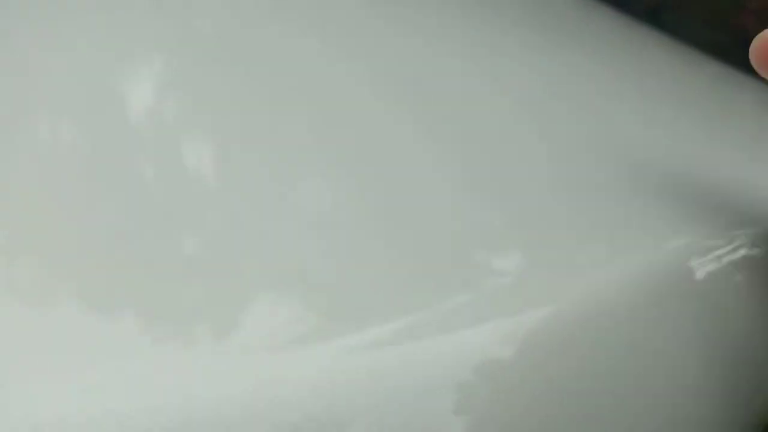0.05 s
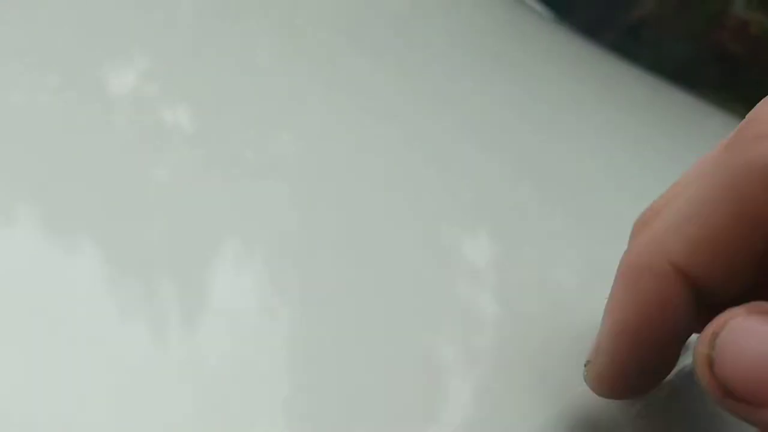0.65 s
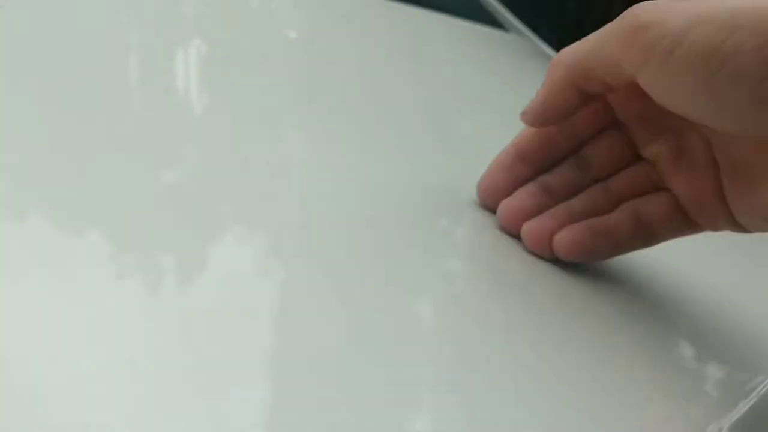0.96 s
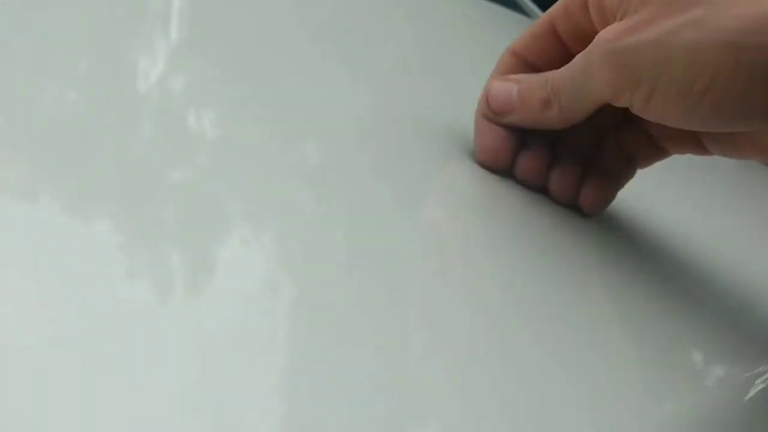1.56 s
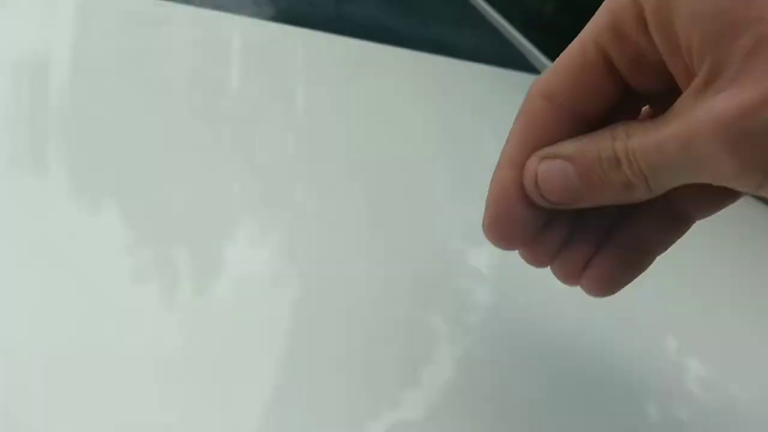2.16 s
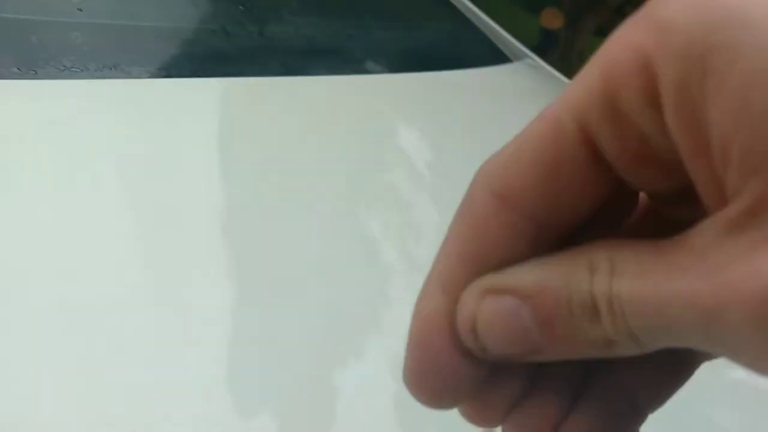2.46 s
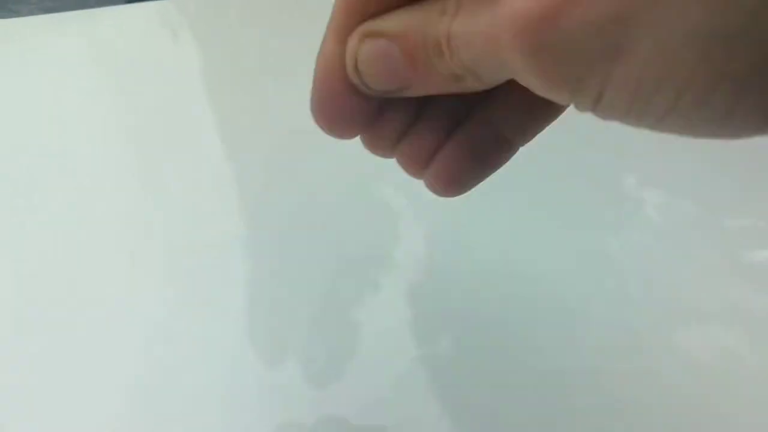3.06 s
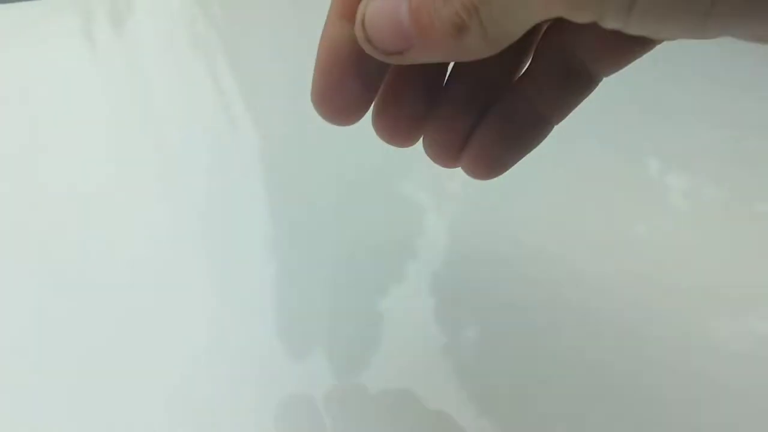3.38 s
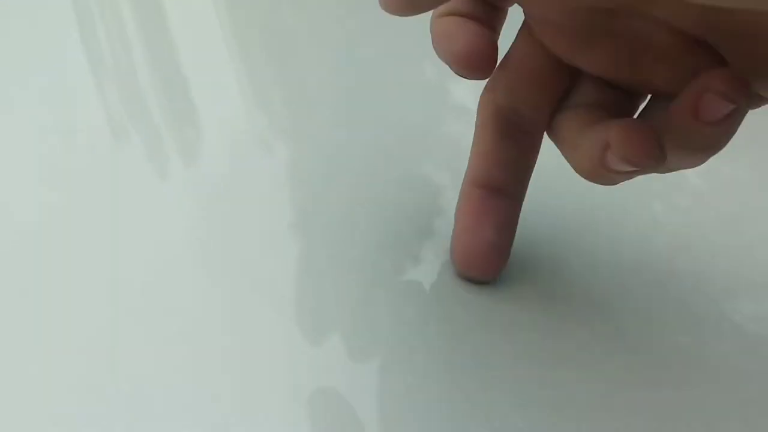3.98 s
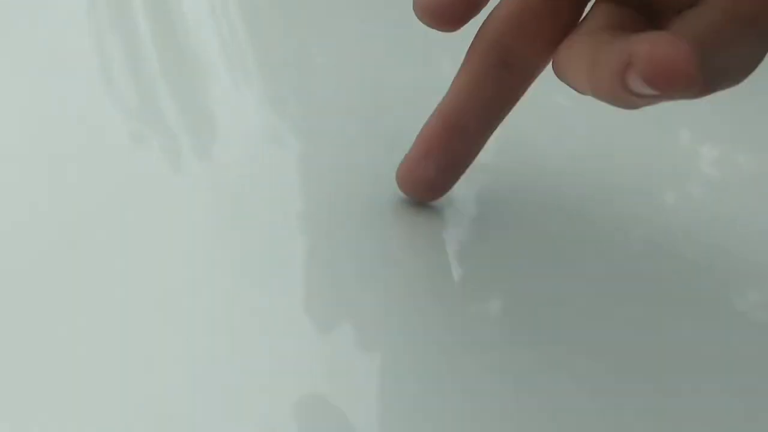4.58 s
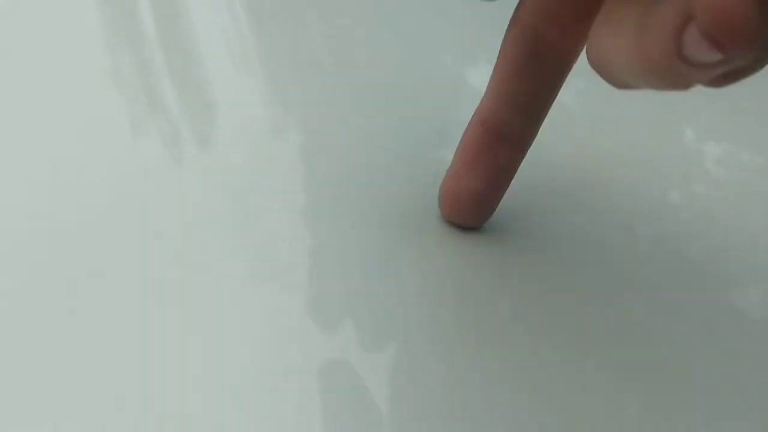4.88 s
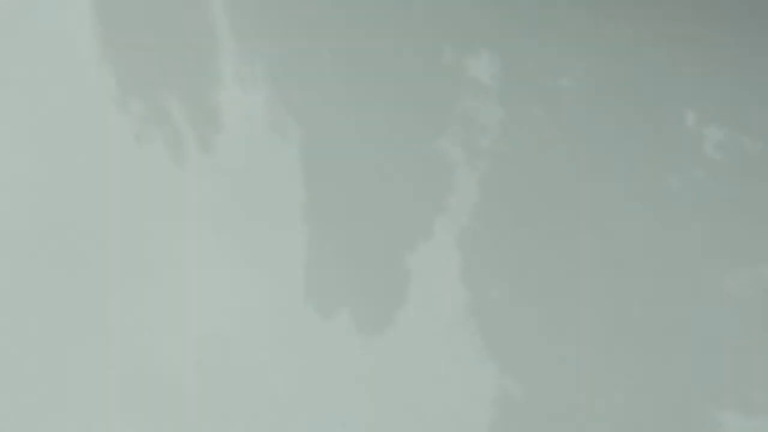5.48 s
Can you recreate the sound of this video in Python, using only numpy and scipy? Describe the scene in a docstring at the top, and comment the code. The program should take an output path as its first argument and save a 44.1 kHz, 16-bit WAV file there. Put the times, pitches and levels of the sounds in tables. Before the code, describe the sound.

Steady, quick finger taps thump and boom on a car's sheet metal body outdoors, with traffic faint in the distance.

```python
"""Outdoors, over distant traffic and a faint insect trill, a hand taps along a car's painted steel panel.
Finger ends strike near the edge first, and the camera gets one knock; knuckles follow, then one fingertip.
Each tap pushes the sheet in with a thump, and it booms in its low modes and shimmers in its dense high ones.
Between taps, skin brushes the paint. Late on come faint far-off calls, and the traffic swells at the end."""
import sys
import numpy as np
from scipy import signal
from scipy.fft import rfft, irfft, next_fast_len
from scipy.io import wavfile
from scipy.ndimage import uniform_filter1d, map_coordinates

SR = 44100
rng = np.random.default_rng(int(sys.argv[2]) if len(sys.argv) > 2 else 0)


def int16_out(signal):
    """Quantize to a 16-bit WAV file."""
    q = np.round(np.clip(np.atleast_2d(signal).T, -1, 1) * 32767)
    wavfile.write(sys.argv[1], SR, q.astype(np.int16))


N = 244120

# spectrum of a contact tick: (frequency [Hz], relative density [dB])
TICK_SPECTRUM = [(700, -5), (2000, -3.5), (2850, 1.5), (3700, -3), (4400, 0), (5500, -5.5), (7500, -8.5),
                 (10000, -17), (15500, -27)]


def amp(db):
    """Amplitude ratio of a level in decibels."""
    return 10 ** (np.asarray(db) / 20)


def unit(x):
    """Normalisation to rms 1."""
    return x / np.sqrt(np.mean(x ** 2) + 1e-20)


def along(points, hz):
    """Interpolation of (frequency [Hz], value) points on a logarithmic frequency axis."""
    f, v = np.transpose(points)
    return np.interp(np.log(hz + 1), np.log(f + 1), v)


def filtered(x, response):
    """Linear filtering: the spectrum is multiplied by a frequency response."""
    n = x.shape[-1]
    m = next_fast_len(n + 8192)
    return irfft(rfft(x, m) * response(np.fft.rfftfreq(m, 1 / SR)), m)[..., :n]


def noise(spectrum, shape):
    """Spectral shaping of white noise, at rms 1."""
    return unit(filtered(rng.standard_normal(shape), lambda hz: amp(along(spectrum, hz))))


def wobble(rate):
    """Smooth random modulation: a spline through `rate` knots a second."""
    return map_coordinates(rng.standard_normal(int(N * rate / SR) + 4), [np.arange(N) * rate / SR])


def spread(three, apart):
    """Partial coherence: left and right share one signal and each add one of their own."""
    return (three[0] + apart * three[1:]) / np.hypot(1, apart)


def panned(db):
    """Intensity panning: gains for a left-right level difference."""
    gains = amp([[db / 2], [-db / 2]])
    return gains / gains.mean()


def add(track, start_s, sound):
    """Superposition of a sound on the track."""
    part = track[:, round(start_s * SR):][:, :sound.shape[-1]]
    part += sound[..., :part.shape[-1]]


def traffic():
    """Broadband noise of distant traffic: rumble, tyre noise and thin hiss swell together."""
    tyre_levels = [(0.0, -59.5), (0.18, -60), (1.34, -50.5), (2.47, -52.5), (3.9, -54), (4.3, -46.5),
                   (5.12, -49.5), (5.54, -42)]  # swell of the traffic: (time [s], level [dB])
    # spectra of the three layers: (frequency [Hz], relative density [dB])
    rumble_spectrum = [(15, -21.5), (40, -7), (90, 3.5), (150, -0.5), (260, -6.5), (500, -17),
                       (1500, -53.5)]
    tyre_spectrum = [(120, -8), (350, 1), (800, 4.5), (1350, -0.5), (2000, -9), (3000, -13), (5000, -21.5),
                     (8000, -22.5), (10000, -45), (15500, -40)]
    hiss_spectrum = [(1000, -14.5), (4000, -5.5), (8000, -2), (10000, -3.5), (15500, 2.5)]
    tyre_db = np.interp(np.arange(N) / SR, *np.transpose(tyre_levels))
    swell_db = tyre_db - tyre_db.mean()
    rumble = amp(-48.5 + swell_db + 0.3 * wobble(4.3)) * spread(noise(rumble_spectrum, (3, N)), 0.71)
    tyres = amp(tyre_db + 0.25 * wobble(12)) * spread(noise(tyre_spectrum, (3, N)), 0.47)
    hiss = amp(-70.5 + 0.32 * swell_db + 0.8 * wobble(4.4)) * spread(noise(hiss_spectrum, (3, N)), 0.37)
    return rumble * panned(6.3) + tyres * panned(1) + hiss * panned(-1.8)


def insect():
    """Stridulation: each wing stroke is a short rough tone that sags in pitch."""
    strokes_per_s, fade_db_per_s = 15, 2.1
    stroke = np.cumsum(strokes_per_s * (1 + 0.059 * wobble(12))) / SR % 1
    hz = 7750 - 550 * stroke ** 2 + 170 * wobble(580)
    envelope = 0.5 + np.exp(-((stroke - 0.35) / 0.32) ** 2)
    trill = unit(envelope * np.sin(2 * np.pi * np.cumsum(hz) / SR))
    level_db = -76.5 - fade_db_per_s * np.arange(N) / SR + 4.7 * wobble(16)
    return amp(level_db) * trill * panned(-2.5)


def far_calls():
    """Spectral broadening: random modulation blurs short glides into hoarse, distant calls."""
    # calls, perhaps of birds: (time [s], duration [s], first pitch [Hz], last pitch [Hz], level [dB])
    calls = [(3.425, 0.19, 1840, 1667, -58.5), (5.289, 0.13, 1080, 1359, -49),
             (5.501, 0.096, 1430, 1495, -40)]
    out = np.zeros((2, N))
    for start_s, length, first_hz, last_hz, db in calls:
        n = int(length * SR)
        glide = np.exp(2j * np.pi * np.cumsum(np.linspace(first_hz, last_hz, n)) / SR)
        blur = (wobble(420) + 1j * wobble(420))[:n]
        add(out, start_s, amp(db) * unit((glide * blur).real * np.sin(np.linspace(0, np.pi, n))))
    return out


def brushes():
    """Stick-slip friction: skin slides over the paint in tiny slips."""
    strokes = [(0.659, 0.038, -62), (1.434, 0.045, -54.5), (1.903, 0.0036, -62), (2.305, 0.014, -59),
               (2.371, 0.076, -57.5), (2.514, .006, -56.5), (2.762, 0.085, -54.5), (2.836, 0.07, -58),
               (4.54, 0.033, -61.5), (5.089, 0.01, -53)]  # skin brushing or leaving the paint: (time [s], duration [s], level [dB])
    skin_spectrum = [(1200, -10.5), (3000, 0), (5500, -3), (8000, -16), (15000, -19)]  # friction noise: (frequency [Hz], relative density [dB])
    out = np.zeros((2, N))
    for start_s, length, db in strokes:
        n = int(length * SR) + 8
        slips = amp(1.8 * unit(uniform_filter1d(rng.standard_normal(n), SR // 700)))
        friction = spread(noise(skin_spectrum, (3, n)), apart=1) * slips
        add(out, start_s, amp(db) * unit(friction * np.sin(np.linspace(0, np.pi, n))))
    return out


def push(t, contact_s, cutoff_hz, soft, order):
    """Thump: a force pulse, cut off in the deep bass, swings a few times, falling in pitch."""
    force = np.abs(np.sin(np.pi * np.minimum(t / contact_s, 1))) ** soft
    swing = signal.sosfilt(signal.butter(order, cutoff_hz, "high", fs=SR, output="sos"), force)
    return swing / np.abs(swing).max()


def knock():
    """Structure-borne sound: a dry bump on the camera's body, with a damped snap of its case."""
    out, t = np.zeros((2, N)), np.arange(SR // 10) / SR
    start_s, contact_s = 0.4652, 0.0017
    case = amp(-20.5) * np.sin(2 * np.pi * 1530 * t) + amp(-24.5) * np.sin(2 * np.pi * 2720 * t)
    snap = (case + amp(-37.5) * noise(TICK_SPECTRUM, len(t))) * np.exp(-t / 0.0024)
    bump = np.array([push(t, contact_s, cutoff_hz=120.5, soft=1.67, order=6),
                     push(t, 1.4 * contact_s, cutoff_hz=116, soft=2.6, order=6)])
    add(out, start_s, amp(-10) * (bump + snap))
    return out


def dense_ring(x, rise_s):
    """Frequency-dependent damping: in a dense cloud of modes, the higher ones fade sooner."""
    decay_times = [(300, 0.51), (800, 0.25), (1500, 0.2), (3000, 0.13), (10000, 0.086)]  # damping of the sheet: (frequency [Hz], 60 dB decay time [s])
    hz, t, spectra = signal.stft(x, SR, nperseg=256)
    decay = amp(-60 * t / along(decay_times, hz)[:, None])
    tail = signal.istft(spectra * decay, SR, nperseg=256)[1][..., :x.shape[-1]]
    return tail * (1 - np.exp(-np.arange(x.shape[-1]) / SR / rise_s))


def tick(t):
    """Contact transient: skin or nail meets the paint with a bright burst."""
    burst = spread(noise(TICK_SPECTRUM, (3, len(t))), apart=0.26)
    return dense_ring(burst, rise_s=0.001) * (1 + 1.02 * np.exp(-t / 0.003))


def shimmer(t, cloud, hard_db, rise_s):
    """Modal overlap: the dense upper modes merge into noise, brighter under a harder touch."""
    db_per_octave = 0.19 * hard_db
    tilted = unit(filtered(cloud, lambda hz: amp(db_per_octave * np.log2(np.clip(hz, 300, 3000) / 700))))
    crack = 1 + 0.93 * np.exp(-t / 0.0034)  # the touch stands briefly above the ring
    return dense_ring(spread(tilted, apart=0.19), rise_s) * crack


def rebound(t, length_s, first_hz, last_hz):
    """Elastic recovery: as the finger lifts, the dent springs out and stiffens, so its note rises."""
    lift = np.minimum(t / length_s, 1)
    hz = first_hz + (last_hz - first_hz) * lift
    return np.sin(np.pi * lift) * np.sin(2 * np.pi * np.cumsum(hz) / SR)


def boom(t, spot, low_db, high_db, rise_s):
    """Modal interference: neighbours start in antiphase, so the ring swells as waves return from the rim."""
    # panel modes: (frequency [Hz], 60 dB decay time [s], relative level at each of the four spots [dB])
    modes = [(97.05, 0.55, -4, -3, -3.5, -1.5), (116, 0.27, -16.5, -11, -7.5, -2),
             (116.9, 0.52, -10.5, 3.5, 4.5, -6.5), (133.45, 0.37, 9, 6.5, 3.5, 8.5),
             (148.5, 0.3, 1.5, -18, -15, -18), (154.3, 0.43, 3, 6.5, 0.5, -3.5),
             (167.9, 0.83, 2, -18, -7.5, -5), (172.8, 0.29, -2.5, -11, -8, -29),
             (206.5, 0.63, -20, -7.5, -15, -8), (226, 1, -36, -12, -9, -11.5),
             (272.7, 0.46, -4.5, -20, -0.5, -2.5), (303, 0.78, -1, -7.5, -5, -5),
             (326.7, 0.55, -2, -5.5, -7.5, -12), (355.5, 0.78, -17, -8, -9, -9),
             (397.5, 0.68, -18, -14.5, -10, -13.5), (431, 0.38, -15, -12, -9, -10),
             (469.2, 0.32, -0.5, -12, -22, -12), (509, 0.52, -20, -26, -23, -35),
             (552, 0.4, -13, -26, -18, -10.5), (602, 0.66, -23, -25, -18, -16),
             (638.5, 0.51, -25, -38, -15, -11), (687, 0.39, -34, -41, -24, -21),
             (773, 0.61, -22, -19, -20, -14.5), (796, 0.35, -8, -14.5, -20, -31),
             (826, 0.28, -39, -13, -18, -42), (921, 0.18, -50, -13.5, -20, -32.5),
             (981, 0.18, -21, -10.5, -26.5, -30.5), (1074, .13, -23, -6.5, -19, -35),
             (1170, 0.34, -15, -21, -33, -31), (1322, 0.25, -12, -18.5, -34, -35)]
    hz, t60, *spot_db = np.transpose(modes)
    upper = np.clip(np.log(hz / 260) / np.log(600 / 260), 0, 1)
    db = spot_db[spot] + (1 - upper) * low_db + upper * high_db + 1.8 * rng.standard_normal(len(hz))
    # the pressing finger detunes the modes anew at every tap, the upper ones most
    hz = hz * (1 + 0.011 * (0.29 + upper) * rng.standard_normal(len(hz)))
    stereo_gains = (-1) ** np.arange(len(hz)) * amp(db + 2.5 * rng.standard_normal((2, len(hz))))
    ring = amp(-60 * t / t60[:, None]) * np.sin(2 * np.pi * hz[:, None] * t)
    return stereo_gains @ ring * (1 - np.exp(-t / rise_s))


def taps():
    """Impact excitation of a plate: the spot struck weights the modes, so taps on one spot ring alike."""
    # taps: (time [s], strength [dB], hardness from soft pad to nail [dB], contact time [s])
    strikes = [(0.298, -10.5, 6, .0039), (0.678, -14, -4, 0.0075), (1.075, -7, 9.5, 0.0043),
               (1.3813, -.5, 7, 0.0054), (1.672, -2, 6.5, 0.0048), (1.962, 0.66, -1, .0047),
               (2.211, -0.7, -0.5, 0.0048), (2.479, 0.4, 0, 0.0046), (2.758, -1, -1, 0.0057),
               (3.034, 0.7, -1.2, 0.0045), (3.302, 0.54, 3, 0.0068), (3.629, -4, 2.5, 0.0034),
               (3.915, -5, 0.2, .0052), (4.088, 1.2, 0.1, 0.0051), (4.272, 2.1, -0.4, 0.0063),
               (4.448, -.5, -3.5, 0.0072), (4.652, 2.5, -2, 0.0062), (4.837, 2.5, -1.5, 0.0056),
               (5.027, 4.5, -1.3, 0.0052)]
    move_times = [.9, 2.1, 3.5]  # the hand moves to the next spot: (time [s])
    # corner, edge, middle, further in: (thump low cut [Hz], shimmer rise [s], finger damping [dB/s],
    # rebound gain [dB], thump gain [dB], tick gain [dB], left-right bias, scaled for each layer [dB])
    spots = [(146, 0.01, 60, -35, -15.5, -36, 6), (137.4, 0.0017, 54.5, -19.5, -10.5, -36, 5),
             (128, 0.0013, 64, -21.5, -6.5, -43.5, 4), (123.3, .0007, 64.5, -18.5, -12, -47.5, 5.5)]
    shimmer_spectrum = [(150, -1.5), (320, 3.5), (560, -4.5), (780, 0.5), (1000, -8.5), (1400, -10),
                        (2000, -18.5), (2700, -19.5), (5000, -40.5)]  # dense upper modes: (frequency [Hz], relative density [dB])
    bass_rolloff = [(55, -10.5), (80, -1), (105, -2), (130, -0.5), (1000, -1)]  # the taps carry little deep bass: (frequency [Hz], gain [dB])
    rest_s = 0.091  # the finger stays on the sheet and damps the boom
    out, t = np.zeros((2, N)), np.arange(SR * 3 // 5) / SR
    spot_clouds = noise(shimmer_spectrum, (len(spots), 3, len(t)))
    for start_s, strength_db, hard_db, contact_s in strikes:
        spot = np.searchsorted(move_times, start_s)
        cutoff_hz, rise_s, damping, rebound_db, thump_db, tick_db, pan_db = spots[spot]
        boom_db, shimmer_db = strength_db - 15.5, strength_db + hard_db - 30
        # a firm tap dents the sheet far more, so the thump grows faster than the strength
        thump = amp(thump_db + 1.45 * strength_db) * push(t, contact_s, cutoff_hz, soft=2.37, order=8)
        low_ring = boom(t, spot, low_db=boom_db - 8.5, high_db=shimmer_db + 2.5, rise_s=0.0043)
        low_ring *= amp(-damping * np.minimum(t, rest_s))
        cloud = unit(spot_clouds[spot] + 0.5 * noise(shimmer_spectrum, (3, len(t))))
        high_ring = amp(shimmer_db) * shimmer(t, cloud, hard_db, rise_s)
        touch = amp(tick_db + strength_db + 0.52 * hard_db) * tick(t)
        release = amp(boom_db + rebound_db) * rebound(t, length_s=0.103, first_hz=132.5, last_hz=168)
        add(out, start_s + 0.0008, high_ring * panned(0.11 * pan_db) + touch * panned(-0.54))
        add(out, start_s + 0.0017, thump * panned(0.75 * pan_db))
        add(out, start_s + 0.00202, low_ring * panned(1.32 * pan_db))
        add(out, start_s + 0.09, release * panned(0.91 * pan_db))
    return filtered(out, lambda hz: amp(along(bass_rolloff, hz)))


def scene():
    """Superposition of all sources at the camera."""
    return taps() + brushes() + knock() + far_calls() + insect() + traffic()


def record(dry):
    """Phase widening in the camera: above the bass, the channels swing in and out of phase with frequency."""
    period_hz, top_hz = 2220, 15800
    low_turn = [(60, 0.73), (150, 0.54), (400, 0.52), (900, 0)]  # (frequency [Hz], phase [rad])

    def widening(hz):
        """Equal and opposite phase shifts for left and right."""
        swing = np.clip(0.5 + 0.39 * np.cos(2 * np.pi * hz / period_hz), 0, 1) * (hz > period_hz / 2)
        turn = np.pi / 2 * swing + along(low_turn, hz)
        return np.exp(1j * np.array([turn, -turn]))
    return filtered(filtered(dry, widening), lambda hz: hz < top_hz)


dry = scene()
out = record(dry)
int16_out(out)
```